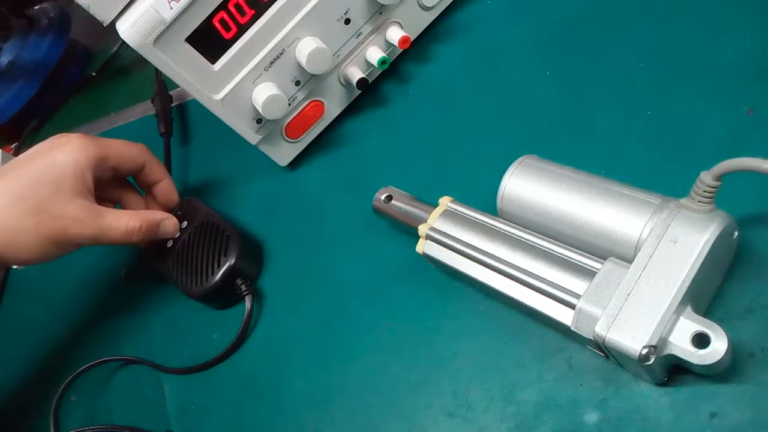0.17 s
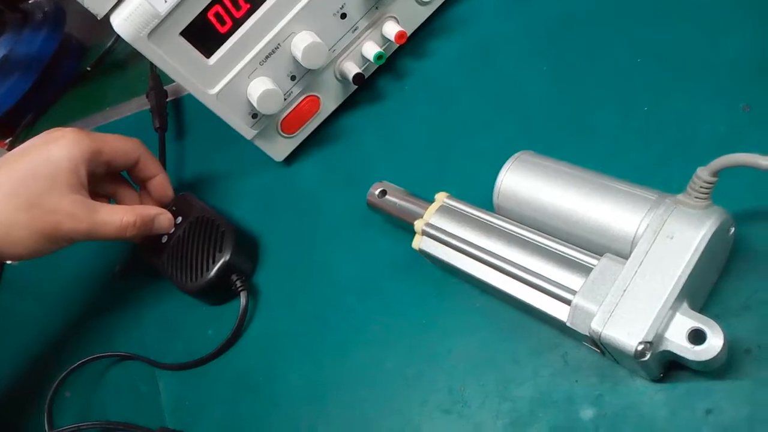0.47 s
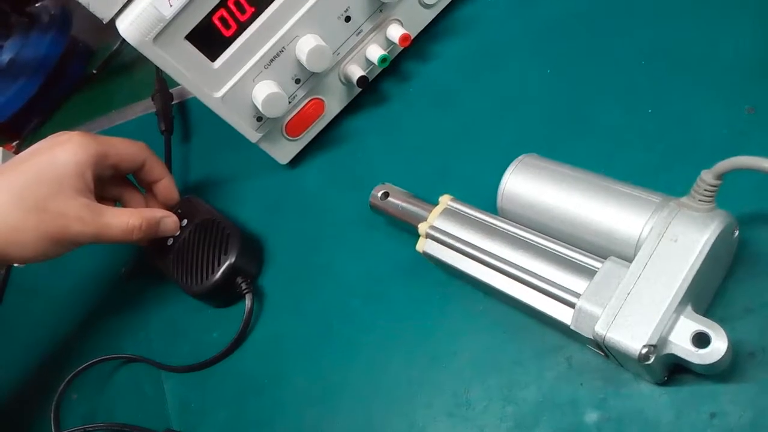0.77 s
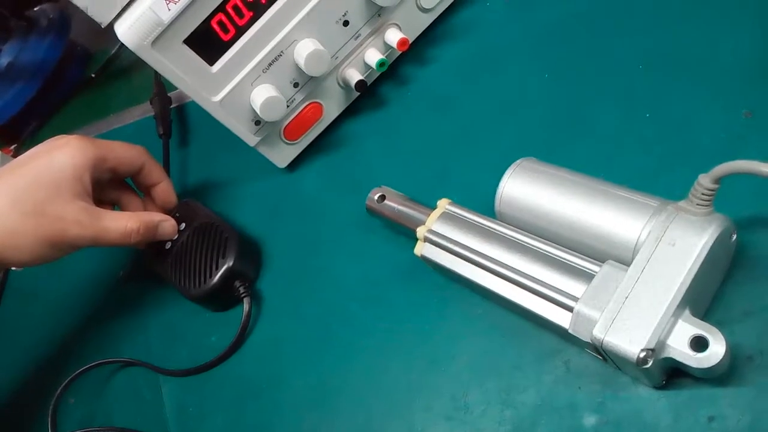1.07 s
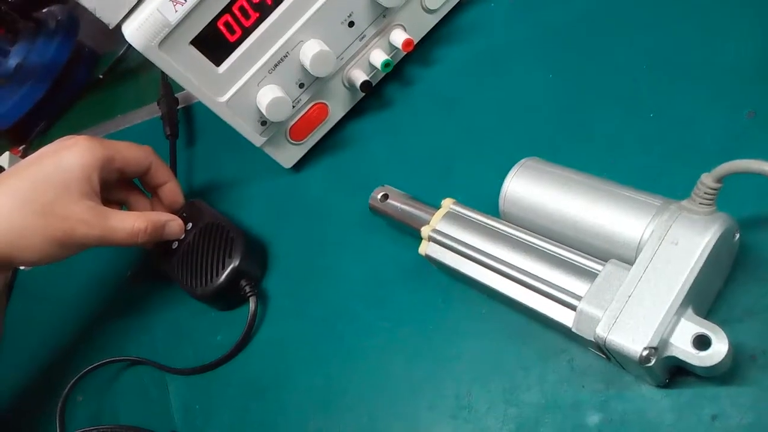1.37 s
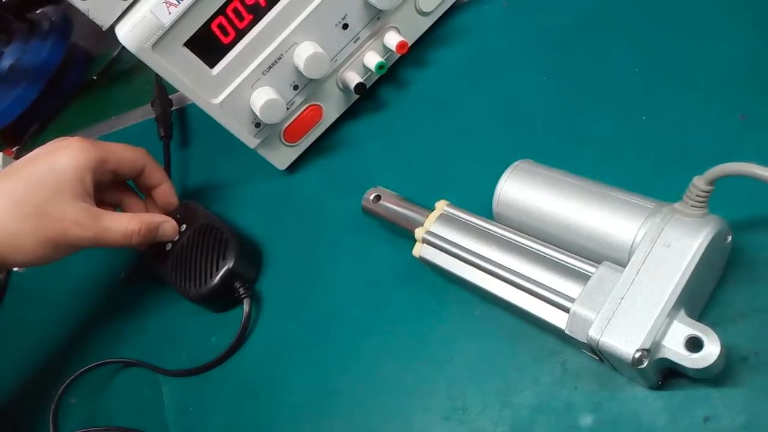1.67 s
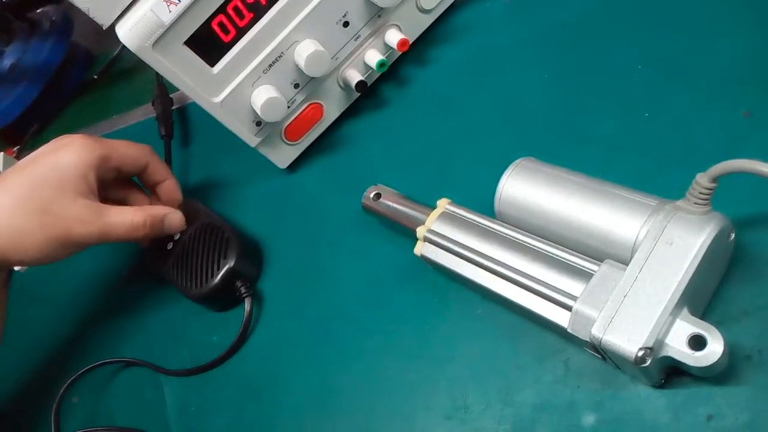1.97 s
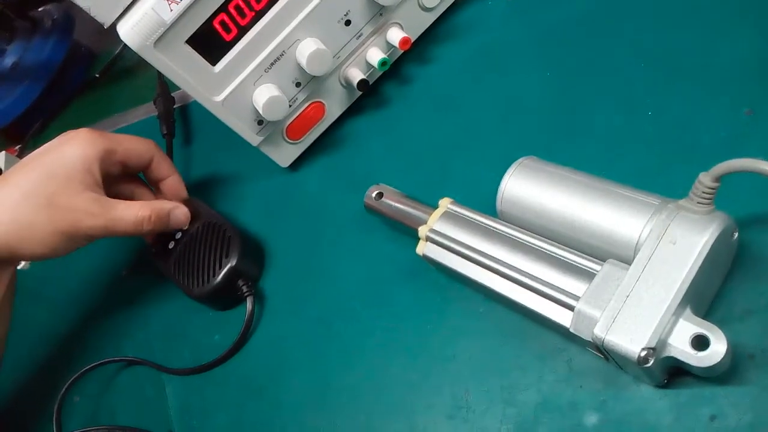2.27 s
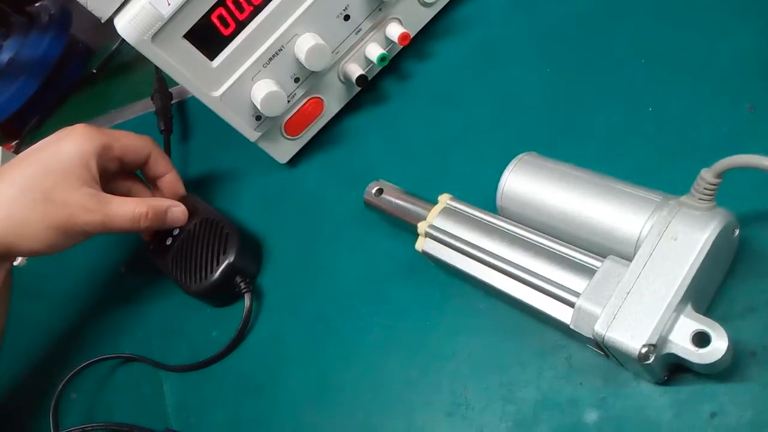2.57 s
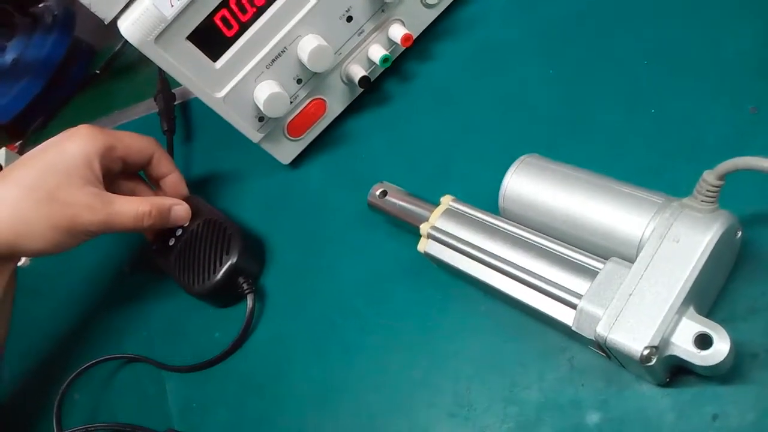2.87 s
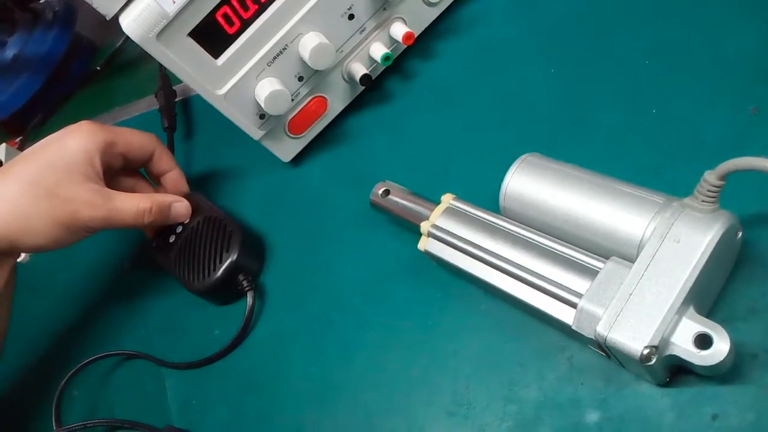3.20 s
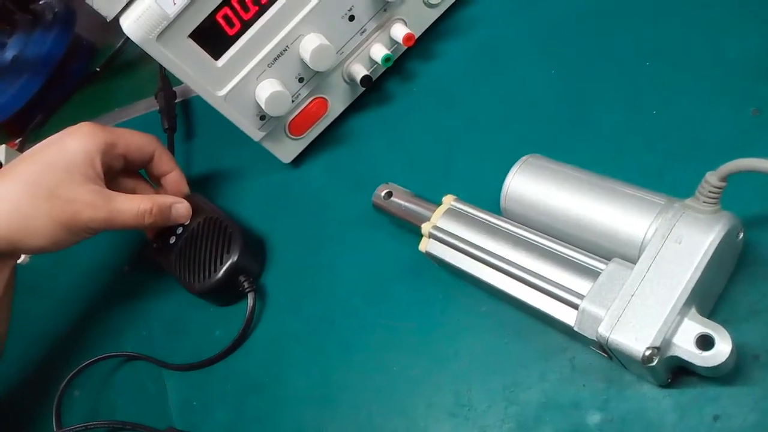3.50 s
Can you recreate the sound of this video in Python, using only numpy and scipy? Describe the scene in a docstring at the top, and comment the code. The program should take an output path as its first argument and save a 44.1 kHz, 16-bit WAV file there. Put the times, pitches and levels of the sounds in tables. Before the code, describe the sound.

A geared motor whir with a high whine stops dead, leaves a short gap of fan hiss and a fading low groan, then clicks and a brief jerk lead into a stronger, pulsing whir, close-miked indoors.

```python
"""Geared actuator on a workbench

Two microphone ports hear a small electric actuator drive its rod out, stop, twitch inward and run back in.
Rubbing noise, beaten by gear, shaft and teeth, rings the housing under whining lines.
A rocker switch clicks four times as decaying modes; a strong gear contact ticks once with the same ringing.
Draught buffets each port as lumpy low noise with puffs; a rough pulsed groan fades in the room.
A fan adds steady, slightly flickering filtered hiss, and the microphone dulls the top."""
import sys
import numpy as np
from scipy.fft import rfft, irfft, next_fast_len
from scipy.io import wavfile
from scipy.ndimage import map_coordinates

SR = 44100
rng = np.random.default_rng(int(sys.argv[2]) if len(sys.argv) > 2 else 0)


def int16_out(signal):
    """Quantize to a 16-bit WAV file."""
    q = np.round(np.clip(np.atleast_2d(signal).T, -1, 1) * 32767)
    wavfile.write(sys.argv[1], SR, q.astype(np.int16))


N = 160524

# Room hiss spectrum: pitch_hz, left_db, right_db, likeness between ports (0 to 1)
ROOM_SPECTRUM = [(304, 9, 2.5, 0.92), (740, 2, 3.5, 0.97), (1060, 0, 1, 0.5), (1880, 2.5, 0.5, 0.061),
                 (2950, -4, -3, 0.035), (6100, -3, -10.5, 0.14), (7700, 0, -19, 0), (8070, -13, -15, 0.03),
                 (10000, -26, -29, 0), (15000, -50, -37, 0)]
ROOM_DB = -44.5  # before its flicker

GROAN_S, GROAN_DB, GROAN_T60_S = 1.635, -33, 1.4  # start, level before the fade, fade time
GROAN_HZ, GROAN_WIDE_HZ, GROAN_RATE_HZ = 266, 110, 42  # resonance, its width, pulse rate

# Draught at each port, before puffs: start_s, level_db
LEFT_DRAUGHT = [(0, -27), (.8, -26.5), (2.9, -27), (3.4, -30)]
RIGHT_DRAUGHT = [(0, -37.5), (.17, -31.5), (.3, -39), (.85, -40.5), (.97, -31.5), (1.1, -41), (2.12, -40),
                 (2.2, -33.5), (2.8, -32), (3.3, -34), (3.45, -36), (3.64, -31)]
# Buffeting spectrum: pitch_hz, relative level_db per Hz
BUFFET_SPECTRUM = [(20, -23), (32, -12.5), (80, 0.5), (123, 0), (260, -7.5), (480, -21), (700, -34),
                   (1100, -64.5)]
# Stronger puffs at the left port, then the right: centre_s, envelope peak level_db, pitch_hz
PUFFS = [
    [(.102, -17, 126), (.723, -14, 150), (.914, -15.5, 164), (1.021, -15, 128), (1.107, -13, 161),
     (1.701, -13, 193), (1.883, -10, 142), (2.035, -14.5, 156), (2.279, -10, 158), (2.523, -14, 230),
     (2.617, -14, 131), (2.945, -16.5, 166), (3.187, -16, 168)],
    [(.178, -19, 132), (2.4, -18.5, 132), (3.619, -16, 120)],
]
FLUTTER_HZ, FLUTTER_GROWS = 186, 1.54  # around and above this pitch the lumps swing wider, by this power

# Four rocker switch clicks, then a small tick from a strong gear contact:
# start_s, nominal level_db, rattle_db beside the main mode
CLICKS = [(1.943, -31.5, -1), (2.3297, -22, -12), (2.337, -21, 0), (2.4402, -22.5, 1.5), (3.337, -33, 3)]
# Ringing given to clicks and tick, main mode first: pitch_hz, level_db, t60_s
CLICK_MODES = [(5900, 0, 0.0095), (3380, -7.5, 0.015), (6530, 1, 0.013), (12700, -6, 0.013)]

# Motor runs: start_s, stop_s, direction (0 out, 1 in, rounded; also scales load), level_db before load, run_up_s
RUNS = [(-.5, 1.948, 0, -37, .03), (2.35, 2.38, 0.91, -31.5, 0.018), (2.444, 4, 1, -32, 0.039)]
COAST_S = 0.0053  # decay constant after the current is cut
# Load on the way in: time_s, level_db
LOAD = [(2.5, -1.5), (2.62, -1), (2.76, 0.5), (2.86, -0.5), (3.1, -1.5), (3.36, 0.5), (3.64, -1.5)]
LURCH_S, LURCH_LONG_S = 2.381, 0.016  # centre of the jolt, its Gaussian width
LURCH_HZ, LURCH_DB = 770, -44

# Motor shaft speed: out_hz, in_hz
SHAFT_HZ = [62.17, 64.39]
SHAFT_DB, SHAFT_PEAK_S = [0.2, -0.6], -0.0035  # swing once a shaft turn, out and in; a moment of its phase zero
# Second gear speed: out_hz, in_hz
GEAR_HZ = [33.5, 34.66]
# A moment of gear phase zero, when its throb is loudest: out_s, in_s
GEAR_PEAK_S = [.02, 2.9925]
# Swing once a gear turn, before load and random variation: out_db, in_db
THROB_DB = [1, 3.7]
# Swing of the 8 and 9 tooth contacts a gear turn: out_db, in_db
TEETH_DB = [1, -0.5]
# Sharp tooth contacts over the rubbing, before the throb: out_db, in_db
GRIT_DB = [9, 17]
GRIT_PER_S = 200  # average rate of contacts

# Whining multiples of the shaft speed: one order per column
SHAFT_ORDERS = [4, 8, 10, 13, 14, 28, 42, 56]
# Shaft whine, rows out and in: nominal level_db, one column per order
SHAFT_LINES_DB = [
    [-57, -54.5, -67, -58, -53, -56.5, -65, -55],
    [-60, -52, -70, -60.5, -58.5, -59, -79, -50],
]
# Whining multiples of the gear speed, rows out and in: one order per column
GEAR_ORDERS = [
    [32, 34, 60, 85, 119],
    [17, 23],
]
# Gear whine, rows out and in: nominal level_db, one column per order
GEAR_LINES_DB = [
    [-61.5, -66, -59, -58, -53],
    [-60, -58.5],
]
WAVER_FROM_DB, WAVER = -51, 0.35  # waver grows by this many dB per dB away from this level

# Housing modes: pitch_hz, width_hz, out_left_db, out_right_db, in_left_db, in_right_db, left_lead_rad
HOUSING = [(1710, 114, -9, -24, -11, -19, 0.93), (2290, 210, -9.5, -9.5, -11.5, -5.5, 0.33),
           (3320, 150, -30, -18, -12, 0, 0.44), (3457, 197, 0.5, -0.5, -4.5, -2, 4.24),
           (3555, 107, 0, -7.5, 7.5, 7.5, 2.87), (4028, 100, -1, 2.5, 3, 6.5, 1.68),
           (4305, 110, -8.5, -1.5, -22, -6, 1.8), (4670, 290, -10, -7, -4.5, -3.5, 1.77),
           (5360, 110, -29.5, -9.5, -20, -2, 1.7), (5985, 160, -5, -8, -7.5, -6, 2),
           (6370, 2300, -12.5, -43, -7.5, -38, 4.22)]
HOUSING_TOP_HZ = 8800  # the modes roll off above this
# Brush and gear hiss: pitch_hz, out_left_db, out_right_db, in_left_db, in_right_db
HISS = [(500, -37, -16, -31, -31), (886, -10.5, -12, -11, -9), (1500, -13.5, -21, -17, -24.5),
        (2620, -38, -7, -15, -12.5), (5140, -12.5, -22, -10, -10), (6300, -9.5, -16, -7.5, -10),
        (8920, -14.5, -21.5, -13, -18), (11240, -26, -19, -23, -16.5), (12000, -29.5, -52, -25.5, -39),
        (13900, -29, -28.5, -28, -28)]
HISS_ALIKE = 0.12  # power share each port's hiss takes from the housing noise

TOP_HZ = 15750  # band limit
DULL_HZ, DULL_DB = 14170, -25  # treble loss starts here and reaches this at the band limit


def amp(db):
    """Amplitude ratio of a level in dB."""
    return 10 ** (np.asarray(db) / 20)


def unit(x):
    """x scaled to an rms of one, all ports together."""
    return x / np.sqrt(np.mean(x ** 2) + 1e-20)


def along(points, hz):
    """Each column after the first, read on a log frequency axis."""
    f, *cols = np.transpose(points)
    return np.array([np.interp(np.log(hz + 1), np.log(f + 1), c) for c in cols])


def wobble(rate):
    """A smooth random curve, rate knots a second."""
    knots = rng.standard_normal(int(N * rate / SR) + 4)
    return map_coordinates(knots, [np.arange(N) * rate / SR])


def filtered(x, response):
    """x filtered by a complex response of frequency, through a padded spectrum."""
    m = next_fast_len(N + SR // 2)
    return irfft(rfft(x, m) * response(np.fft.rfftfreq(m, 1 / SR)), m)[..., :N]


def resonance(f, hz, width_hz):
    """Response of a damped mode, one at its centre."""
    return 1j * f * width_hz / (hz * hz - f * f + 1j * f * width_hz)


def room():
    """Fan hiss with a slight flicker, mostly alike in both ports only in the lower middle."""
    own, both = rng.standard_normal((2, N)), rng.standard_normal(N)

    def alike(f):
        return np.clip(along(ROOM_SPECTRUM, f)[2], 0, 1)

    mix = filtered(own, lambda f: np.sqrt(1 - alike(f))) + filtered(both, lambda f: np.sqrt(alike(f)))
    hiss = filtered(mix, lambda f: amp(along(ROOM_SPECTRUM, f)[:2]) * (f > 200))
    return amp(ROOM_DB + 1.8 * wobble(21)) * unit(hiss)


def groan():
    """A low rough groan somewhere in the room: uneven pulses through a resonance, fading."""
    t = np.arange(N) / SR - GROAN_S
    pulses = np.diff(np.floor(GROAN_RATE_HZ * t + 0.1 * wobble(30)), prepend=0) > 0
    rough = pulses * amp(2.8 * wobble(49.7)) + 0.044 * rng.standard_normal(N)
    tone = unit(filtered(rough, lambda f: resonance(f, GROAN_HZ, GROAN_WIDE_HZ) ** 2))
    fade = amp(GROAN_DB - 60 * np.abs(t) / GROAN_T60_S)
    return fade * np.clip(t / 0.017, 0, 1) * (t < 0.28) * tone


def draught():
    """Lumpy low noise from air at the microphone, unrelated in the two ports, with single stronger puffs."""
    t = np.arange(N) / SR
    level_db = [np.interp(t, *np.transpose(port)) for port in (LEFT_DRAUGHT, RIGHT_DRAUGHT)]
    lumps = amp([7 * np.tanh(0.17 * wobble(17) + 0.51 * wobble(70)) for port in range(2)])

    def upper(f):  # share of power in the fluttering upper part
        return 1 / (1 + (FLUTTER_HZ / (f + 1)) ** 2)

    low = unit(lumps) * rng.standard_normal((2, N))
    high = unit(lumps ** FLUTTER_GROWS) * rng.standard_normal((2, N))
    air = (filtered(low, lambda f: amp(along(BUFFET_SPECTRUM, f)) * np.sqrt(1 - upper(f)))
           + filtered(high, lambda f: amp(along(BUFFET_SPECTRUM, f)) * np.sqrt(upper(f))))
    out = amp(level_db) * [unit(a) for a in air]
    for port, puffs in enumerate(PUFFS):
        for s, db, hz in puffs:
            cycles = hz * (t - s)
            wave = np.cos(2 * np.pi * cycles + rng.uniform(0, 2 * np.pi))
            out[port] += amp(db) * np.exp(-(cycles / 0.63) ** 2) * wave
    return out


def clicks_and_tick():
    """Switch clicks and one gear-contact tick, all ringing the same decaying modes over a burst of bright noise."""
    out, t = np.zeros((2, N)), np.arange(SR // 20) / SR
    for s, db, rattle_db in CLICKS:
        ring = 0
        for k, (hz, level, t60) in enumerate(CLICK_MODES):
            mode_db = level + rattle_db * (k > 0) + rng.normal(0, 1, (2, 1))
            phase = rng.uniform(0, 3.4, (2, 1))
            ring = ring + amp(mode_db - 60 * t / t60) * np.sin(2 * np.pi * hz * t + phase)
        bright = filtered(rng.standard_normal((2, len(t))), lambda f: f > 2500)[:, :len(t)]
        tail = 0.67 * amp(rattle_db - 60 * t / 0.029) * bright
        attack = 1 - np.exp(-t / 0.0007)
        out[:, round(s * SR):][:, :len(t)] += amp(db - 3) * attack * (ring + tail)
    return out


def whine(way, shaft, gear):
    """Sines at multiples of shaft and gear speed, sharing a speed drift and wavering in level and phase."""
    drift = np.cumsum(0.00301 * wobble(14)) / SR
    sources = ((SHAFT_ORDERS, SHAFT_LINES_DB, shaft, SHAFT_HZ[way]),
               (GEAR_ORDERS[way], GEAR_LINES_DB, gear, GEAR_HZ[way]))
    lines = 0
    for orders, levels, turn, hz in sources:
        for k, db in zip(orders, levels[way]):
            waver = unit(amp(WAVER * abs(WAVER_FROM_DB - db) * wobble(12)))
            phase = k * (turn + 2 * np.pi * hz * drift) + 0.46 * wobble(30) + rng.uniform(0, 2 * np.pi)
            lines = lines + amp(db + 3.5) * waver * np.sin(phase)
    return lines


def whir(way):
    """Steady running one way: rubbing noise beaten by gear, shaft and teeth through the housing, and whine."""
    t = np.arange(N) / SR
    gear = 2 * np.pi * GEAR_HZ[way] * (t - GEAR_PEAK_S[way])
    shaft = 2 * np.pi * SHAFT_HZ[way] * (t - SHAFT_PEAK_S)
    throb_depth = 1 + way * np.interp(t, *np.transpose(LOAD)) / 6 + 0.15 * wobble(4)
    throb_db = THROB_DB[way] * throb_depth * np.cos(gear)
    teeth_db = TEETH_DB[way] * (np.cos(8 * gear) + np.cos(9 * gear))
    beat_db = throb_db + SHAFT_DB[way] * np.cos(shaft) + teeth_db + 0.5 * wobble(27.93)
    contacts = (rng.random(N) < GRIT_PER_S / SR) * rng.standard_normal(N)
    grit = amp(GRIT_DB[way] + throb_db) * contacts
    rub = amp(beat_db) * (rng.standard_normal((3, N)) + grit)  # housing, left hiss, right hiss
    rub[1:] = np.sqrt(1 - HISS_ALIKE) * rub[1:] + np.sqrt(HISS_ALIKE) * rub[0]
    rub[1:] *= amp(-0.5 * throb_db)  # the hiss throbs less
    ports = slice(2 * way, 2 * way + 2)

    def modes(f):
        total = 0
        for k, (hz, width_hz, *db, lead_rad) in enumerate(HOUSING):
            gains = amp(db[ports]) * np.exp([1j * lead_rad, 0])
            total = total + resonance(f, hz, width_hz) * gains[:, None] * (-1) ** k  # alternating sign
        return total / (1 + (f / HOUSING_TOP_HZ) ** 8)

    hiss = filtered(rub[1:], lambda f: amp(along(HISS, f)[ports]) * (f > 300))
    return unit(filtered(rub[0], modes) + hiss), whine(way, shaft, gear)


def actuator():
    """Each run swells in, holds and dies quickly when the current is cut; the body hums as the twitch jolts it."""
    t, out = np.arange(N) / SR, 0
    ways = [whir(way) for way in range(2)]
    hum = unit(filtered(rng.standard_normal(N), lambda f: resonance(f, LURCH_HZ, 83)))
    for on, off, way, db, rise in RUNS:
        gate = np.clip((t - on) / rise, 0, 1) * np.exp(-np.clip(t - off, 0, None) / COAST_S)
        noise, lines = ways[int(round(way))]
        load_db = way * np.interp(t, *np.transpose(LOAD))
        out = out + gate * (amp(db + load_db) * noise + gate ** 2 * lines)  # whine swells later, dies sooner
    return out + amp(LURCH_DB) * np.exp(-((t - LURCH_S) / LURCH_LONG_S) ** 2) * hum


def scene():
    """Everything reaching the two ports, background first."""
    return room() + groan() + draught() + clicks_and_tick() + actuator()


def record(dry):
    """The microphone dulls the top; nothing is kept from the band limit up."""
    def response(hz):
        loss_db = DULL_DB * np.clip((hz - DULL_HZ) / (TOP_HZ - DULL_HZ), 0, 1)
        return amp(loss_db) * (hz < TOP_HZ)

    return filtered(dry, response)


dry = scene()
out = record(dry)
int16_out(out)
```